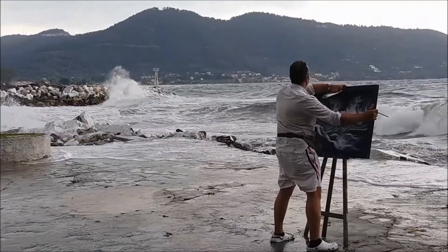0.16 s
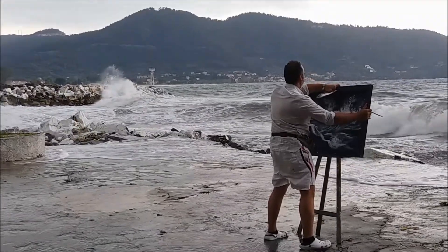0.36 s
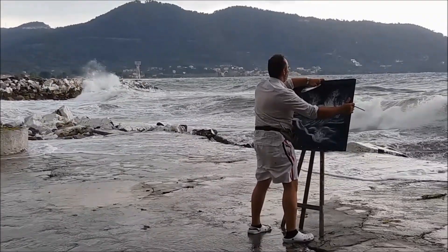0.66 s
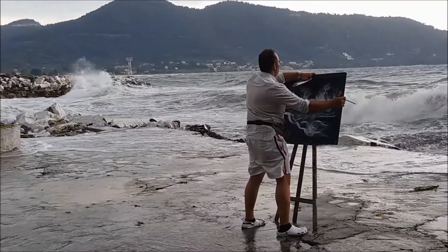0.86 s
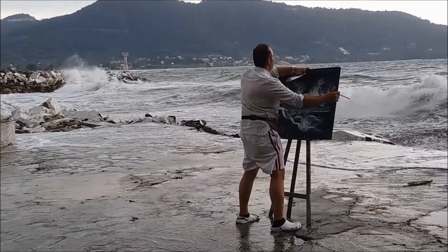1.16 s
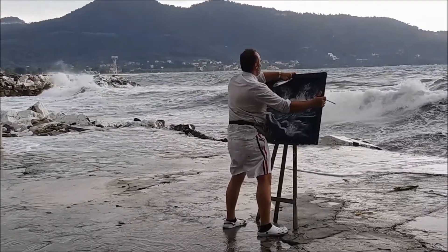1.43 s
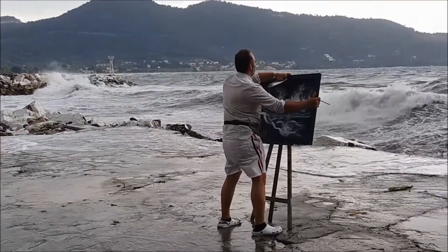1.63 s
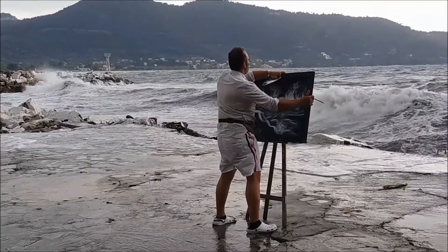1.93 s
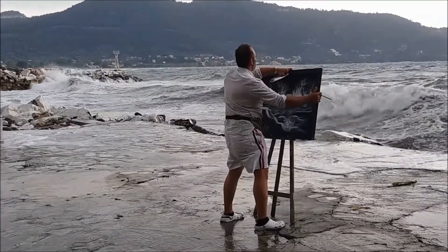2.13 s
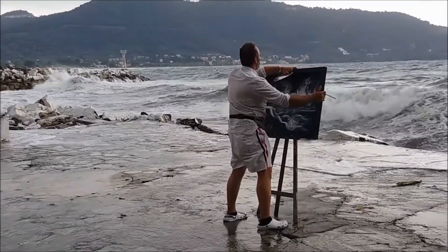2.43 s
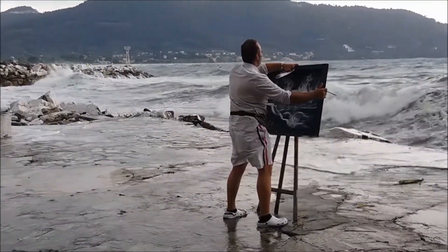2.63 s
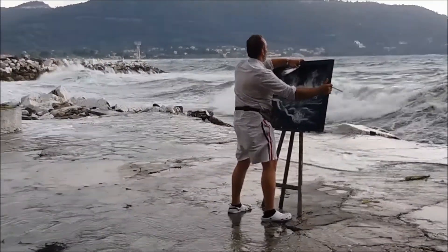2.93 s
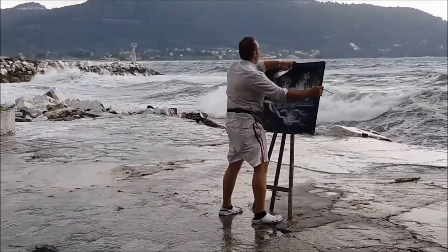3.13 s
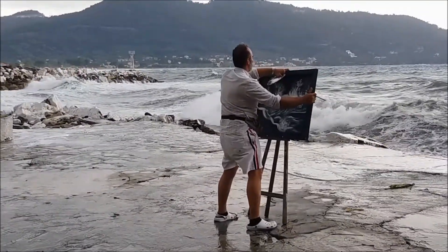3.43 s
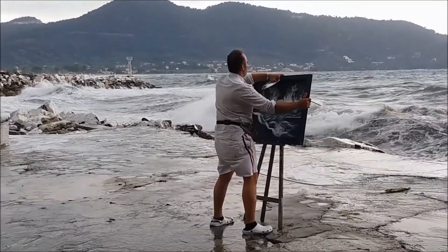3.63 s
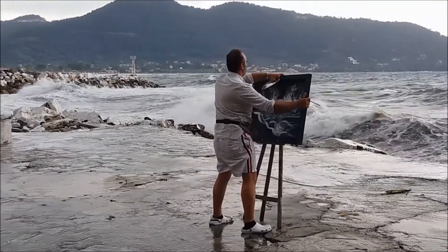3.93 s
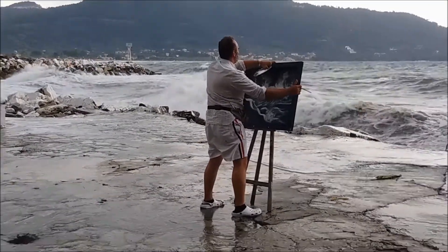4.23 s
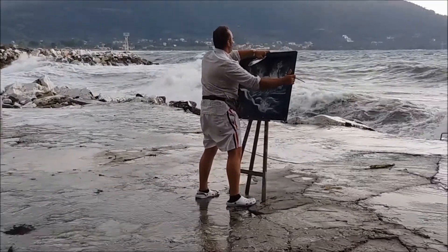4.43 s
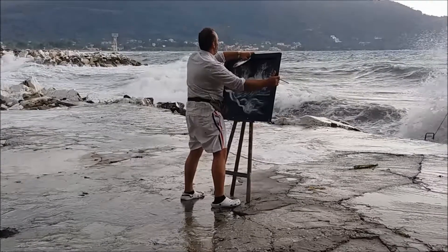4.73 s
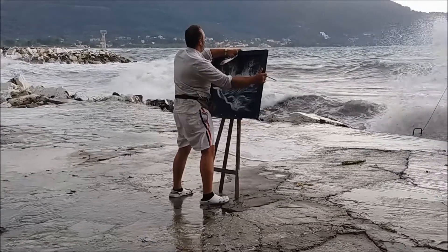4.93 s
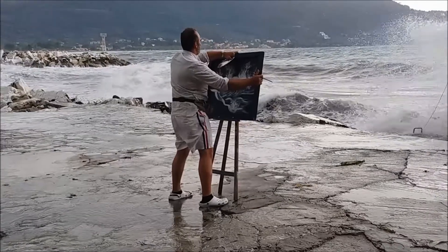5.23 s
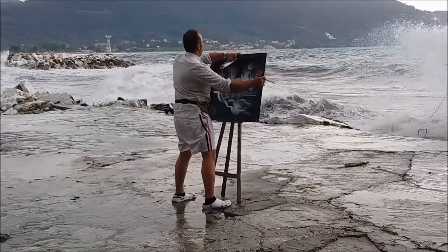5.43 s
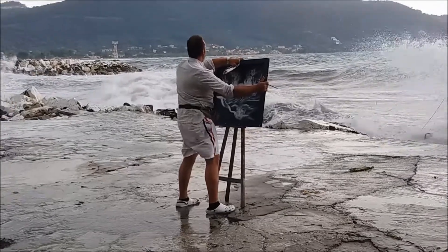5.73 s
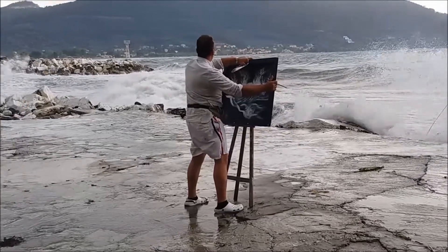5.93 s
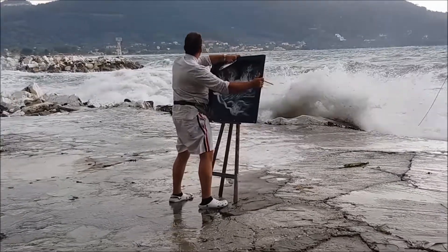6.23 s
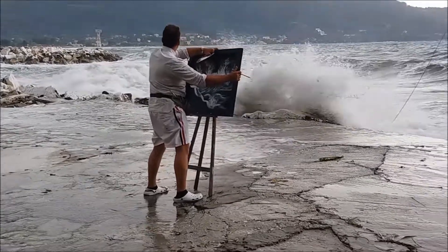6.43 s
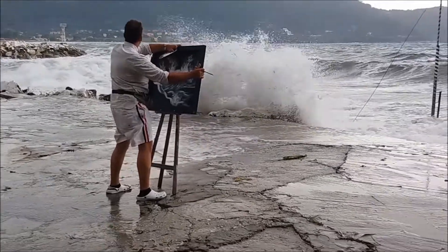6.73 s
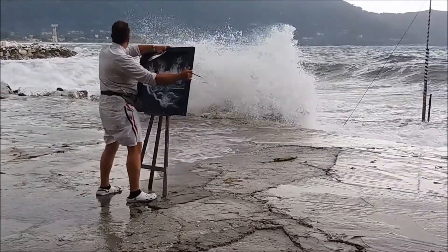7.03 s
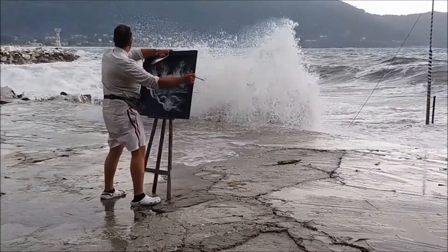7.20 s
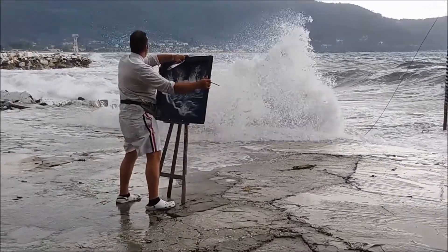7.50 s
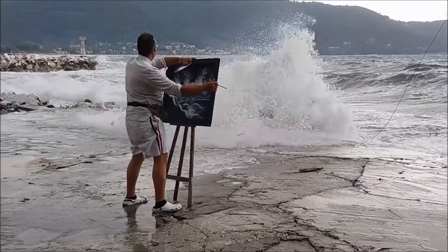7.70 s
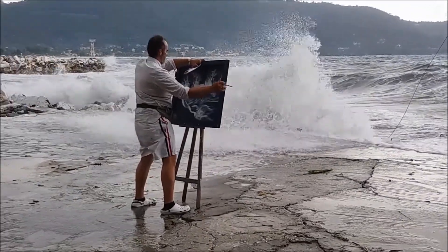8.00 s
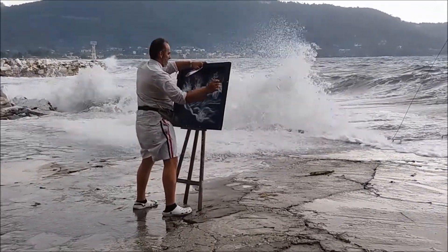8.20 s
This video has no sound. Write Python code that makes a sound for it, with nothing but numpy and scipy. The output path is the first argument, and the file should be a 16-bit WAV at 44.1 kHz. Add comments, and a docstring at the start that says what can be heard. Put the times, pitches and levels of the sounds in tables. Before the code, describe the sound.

A close hand-held mono microphone faces rough waves on a paved waterfront. The sea is a dense, steady wash with hollow low swells and a fizzy top, no clear separate crashes. Low wind thumps and rumbles crowd the opening, thinning after three seconds. Occasional drops tick and thud on the housing. Toward the end the microphone turns away and the surf sounds softer and more muffled.

```python
"""Gusty wind rumbles and buffets in a small hand-held microphone while rough surf roars on a breakwater.
The sea is noise that changes in level and in colour as the microphone turns, with swells around one pitch.
Wind is lumpy low noise, and the strongest eddies are short swings of the diaphragm that slow down.
A few drops of spray tap the housing as brief rings with a thump and a splash.
A limiter ducks everything around the highest peaks."""
import sys
import numpy as np
from scipy import signal
from scipy.io import wavfile
from scipy.ndimage import uniform_filter1d, minimum_filter1d

SR = 44100
rng = np.random.default_rng(int(sys.argv[2]) if len(sys.argv) > 2 else 0)


def master_out(mix):
    """Clip the mix to full scale and print it as 16-bit PCM to the path in sys.argv[1]."""
    frames = np.transpose(np.atleast_2d(mix))
    ceiling = np.clip(frames, -1, 1)
    pcm = np.round(ceiling * 32767).astype(np.int16)
    wavfile.write(sys.argv[1], SR, pcm)


N = 368676  # samples


def gain_of(db):
    """Amplitude factor of a level in dB."""
    return 10 ** (np.asarray(db) / 20)


def evened(x):
    """Scales a signal to rms 1."""
    return x / np.sqrt(np.mean(x ** 2) + 1e-20)


def bump(x, width):
    """Bell of height 1 around x = 0."""
    return np.exp(-(x / width) ** 2)


def ramp(hz, lo_hz, hi_hz):
    """Rises from 0 to 1 between two frequencies, evenly in pitch."""
    return np.clip(np.log((hz + 1) / lo_hz) / np.log(hi_hz / lo_hz), 0, 1)


def read(points, hz):
    """Reads a spectrum table at the frequencies hz, straight lines over log frequency."""
    point_hz, level_db = np.transpose(points)
    return np.interp(np.log(hz + 1), np.log(point_hz + 1), level_db)


def follow(rows, t):
    """Reads every column of a time table at the times t."""
    row_s, *columns = np.transpose(rows)
    return [np.interp(t, row_s, column) for column in columns]


def add(mix, start_s, sound):
    """Adds a sound to the mix from its start time, cut at the end of the mix."""
    part = mix[round(start_s * SR):][:len(sound)]
    part += sound[:len(part)]


def grid(size):
    """Frame times [s] and bin frequencies [Hz] of short-time spectra that overlap by three quarters."""
    t = np.arange(N * 4 // size + 5) * size / 4 / SR
    return t, np.fft.rfftfreq(size, 1 / SR)[:, None]


def noise(field_db, size):
    """Random short-time spectra under a dB field of bins x frames, each bin adding its rms level."""
    bins, frames = field_db.shape
    real, imaginary = rng.standard_normal((frames, bins, 2)).T
    # sqrt(3/2) makes up for the averaging of overlapping random frames
    spectra = (real + 1j * imaginary) * gain_of(field_db) * np.sqrt(3 / 2)
    return signal.istft(spectra, nperseg=size, noverlap=size * 3 // 4)[1][:N]


def blotches(bins, frames, high, long):
    """Smooth random patches of rms 1, averaged over `high` bins and `long` frames."""
    x = rng.standard_normal((frames, bins)).T
    return evened(uniform_filter1d(uniform_filter1d(x, high, 0), long, 1))


def band_db(colour_db, hz, lo_hz, hi_hz):
    """Power of a spectrum summed inside a band, in dB."""
    inside = (hz >= lo_hz) & (hz < hi_hz)
    return 10 * np.log10(np.sum(gain_of(2 * colour_db) * inside, 0))


def levelled(colour_db, hz, edges_hz, levels_db):
    """Bends a spectrum smoothly to bring its low, middle and high bands to the given levels."""
    low, mid, high = (db - band_db(colour_db, hz, *edges_hz[k:k + 2]) for k, db in enumerate(levels_db))
    below = 1 - ramp(hz, .8 * edges_hz[1], 1.25 * edges_hz[1])
    above = ramp(hz, .8 * edges_hz[2], 1.25 * edges_hz[2])
    return colour_db + mid + below * (low - mid) + above * (high - mid)


# Wind at the microphone: (time [s], strength [dB], tilt from flutter towards deep rumble [dB])
WIND_STRENGTH = [(0, -26.5, 0.5), (.3, -22., 0.5), (.65, -20.5, -4.5), (1.0, -23.5, -1), (1.4, -24.5, 1),
                 (2.2, -25, 0), (2.7, -24.5, 4.5), (3.3, -24., -2), (4.0, -26., -2.5), (4.8, -26.5, -4.),
                 (5.4, -29.5, 0), (6.0, -32.5, -1), (6.5, -30.5, 2), (7.2, -32, -0.5), (7.7, -30, -2),
                 (8.36, -32., 2)]
# Colour of the turbulence: (frequency [Hz], relative level per Hz [dB])
EDDY_COLOUR = [(10, -32), (22, -14), (40, -2), (80, 4), (130, -2), (205, -4.5), (260, -13.5), (330, -16.5),
               (450, -19.5), (800, -66.5)]
# How deep rumble, body and flutter follow the wind, a row each:
# (level at CALM_DB before tilt and swells [dB], slope [dB per dB], share of the tilt, middle frequency [Hz])
WIND_BANDS = [(-35.5, 1.6, 0.85, 40), (-30., 1.01, 0.24, 116), (-33.5, 0.83, -0.48, 154)]
# Brief swells of the low wind noise, each strongest around one pitch:
# (time of the peak [s], rise at the middle frequency [dB], middle frequency [Hz])
WIND_SWELLS = [(.2, 5, 50), (.3, 8, 220), (.6, 7, 40), (.66, 5, 190), (.92, 12, 40), (1.0, 4, 111),
               (1.2, 4, 40), (1.68, 14, 40), (1.8, 4.5, 80), (2.02, 0, 45), (2.22, 9, 40), (2.5, 5.5, 111),
               (2.86, 1, 40), (3.0, 7.5, 45), (3.0, 5.5, 200), (3.4, 2.5, 120), (4.0, 2, 80),
               (5.8, 4.5, 150), (6.1, 4., 45), (6.6, 3, 110), (7.4, 3., 40), (8.0, 7., 40)]
CALM_DB = -30
WIND_SWELL_S, WIND_SWELL_OCTAVES = 0.071, 0.8  # half-widths in time and pitch


def wind(size=1024):
    """Turbulence over the port: low noise in lumps across the whole band, with brief swells around a pitch."""
    t, hz = grid(size)
    peak_s, rise_db, swell_hz = np.transpose(WIND_SWELLS)[:, :, None]
    strength_db, tilt_db = follow(WIND_STRENGTH, t)
    levels_db = []
    for calm_db, slope, tilt_share, band_hz in WIND_BANDS:
        nearness = bump(np.log2(swell_hz / band_hz), WIND_SWELL_OCTAVES)
        swells_db = np.sum(rise_db * bump(t - peak_s, WIND_SWELL_S) * nearness, 0)
        levels_db.append(calm_db + slope * (strength_db - CALM_DB) + tilt_share * tilt_db + swells_db)
    field_db = levelled(read(EDDY_COLOUR, hz), hz, (20, 60, 160, 300), levels_db)
    low = noise(field_db, size)
    lumps = evened(uniform_filter1d(uniform_filter1d(rng.standard_normal(N), size=900), size=900))
    return low * gain_of(1.64 * lumps)  # lumps of 1.64 dB rms


# Single strong eddies at the port:
# (start time [s], relative level [dB], mean swing frequency [Hz], length [cycles])
BUFFETS = [(0.537, -3.5, 149.8, 4.8), (0.558, -7, 64.3, 1.6), (0.646, -10, 141.5, 4.6),
           (.664, -1.5, 74, 3.1), (0.757, -7.5, 97, 2.6), (0.96, -10, 80.5, 1.9), (1.605, -16, 58.3, 2.6),
           (1.641, -11, 81.8, 4.2), (1.693, -10, 75, 1.24), (1.718, -10, 72, 1.9), (1.779, -9, 79, 2.9),
           (1.988, -8.5, 55.6, 2.3), (2.168, -15.5, 48.5, 2.5), (2.778, -12.5, 42, 2.8),
           (3.962, -21, 106, 1.9), (7.708, -21.5, 175, 3.6), (8.127, -21, 173, 3)]


def buffets():
    """Each eddy pushes the diaphragm through a few swings that slow down."""
    out = np.zeros(N)
    ragged = signal.butter(2, [170, 480], "band", fs=SR, output="sos")
    for start_s, db, hz, cycles in BUFFETS:
        u = np.arange(0, 1, hz / cycles / SR)  # progress through the eddy, 0 to 1
        swing = np.sin(2 * np.pi * cycles * (u + .3 * u * (1 - u)))
        swing -= 0.64 * swing ** 2  # suction peaks are sharper than pushes
        # smaller eddies ride along, more on quick swings
        small_eddies = evened(signal.sosfilt(ragged, rng.standard_normal(8000)))[-len(u):]
        swing += 0.23 * (hz / 120) * small_eddies
        envelope = np.sin(np.pi * u ** 0.66) ** 1.64
        add(out, start_s, gain_of(db) * swing * envelope)
    return out


# Spray on the housing; levels are relative, before the soft onset:
# (time [s], ring level [dB], ring frequency [Hz], ring t60 [s], thump level [dB], splash level [dB])
TAPS = [(1.345, -9, 536, 0.025, -6, -28), (1.603, -23, 880, 0.011, -4, -24),
        (2.0765, -18, 4840, 0.0065, -60, -40), (5.0322, 3.5, 776, 0.0059, -2.5, -24),
        (5.502, 1, 564, 0.021, 2, -18), (6.192, -21, 1320, 0.028, -12, -30),
        (6.532, -25, 1170, 0.055, -5.5, -23), (6.619, -21, 1370, 0.018, -35, -28),
        (7.343, -18, 895, 0.014, -24, -32), (7.816, -21, 600, 0.014, -25, -27.5),
        (8.154, -12, 1560, 0.0095, -8, -25)]
THUMP_HZ, THUMP_T60_S, SPLASH_T60_S = 178, 0.027, 0.096


def taps():
    """A soft blow: a brief ring of the housing over a dull thump, and the drop's splash."""
    out = np.zeros(N)
    t = np.arange(0, .09, 1 / SR)
    onset = 1 - np.exp(-(t / .0005) ** 2)
    wet = signal.butter(4, [400, 1900], "band", fs=SR, output="sos")
    hisses = rng.standard_normal((len(TAPS), len(t)))
    for (start_s, ring_db, hz, t60_s, thump_db, splash_db), hiss in zip(TAPS, hisses):
        fade_db = -60 * t / t60_s
        ring = np.sin(2 * np.pi * hz * t)
        ring += .45 * gain_of(fade_db / 2) * np.sin(2 * np.pi * 1300 * t)  # fades faster than the main ring
        thump = gain_of(thump_db - 60 * t / THUMP_T60_S) * np.sin(2 * np.pi * THUMP_HZ * t)
        thump *= 1 - np.exp(-t / 0.0023)
        splash = gain_of(splash_db - 60 * t / SPLASH_T60_S) * evened(signal.sosfilt(wet, hiss))
        add(out, start_s, onset * (gain_of(ring_db + fade_db) * ring - thump + splash))
    return out


# The sea: (time [s], level of the body, 1150 to 3150 Hz [dB])
SURF_BODY = [(0, -29.5), (.4, -26), (.62, -28.5), (1.05, -29.), (1.75, -32.5), (2.2, -29.), (2.62, -25),
             (2.82, -26.5), (3.02, -29), (3.6, -31.), (4.0, -32.5), (4.6, -33.), (5.1, -31), (5.4, -31.5),
             (5.62, -31.), (5.88, -32.5), (6.02, -35.5), (7.2, -36), (8.36, -35)]
# Roar with the microphone facing the waves: (frequency [Hz], relative level per Hz [dB])
FACING_COLOUR = [(200, -14), (300, 2.5), (450, 8), (600, 7), (790, 1), (970, 9.5), (1080, 1.5), (1280, 4.5),
                 (1430, 1), (1650, 3), (1850, 1), (2100, -1), (2600, -1.5)]
# Roar with the microphone turned away: (frequency [Hz], relative level per Hz [dB])
TURNED_COLOUR = [(200, -15), (300, 7.5), (450, 6.5), (700, 9.5), (820, 7), (940, 7), (1250, 6), (1500, -2),
                 (1850, -4.5), (2100, 4), (2350, -2.5), (2600, -0.5)]
# Resonances of the microphone port and housing: (frequency [Hz], relative level [dB])
PORT = [(2200, -0.5), (2700, -6), (3150, -12.5), (3450, -10.5), (3950, -4.5), (4300, -9), (5000, -16),
        (5750, -23.5), (6300, -20.5), (6900, -19.5), (7800, -23.5), (8700, -24), (9800, -26)]
# Aim of the microphone:
# (time [s], turn from 0 facing to 1 away, treble above 5 kHz before the bands are levelled [dB])
TURN = [(0, .42, -1.5), (.9, 0.25, -1.5), (1.6, .35, -2.5), (2.1, .01, -1.), (2.7, .05, -0.5),
        (3.7, 0.15, -1), (4.5, .35, 0), (5.8, 0.36, -1.3), (6.1, 0.58, -3), (7.3, .72, -3),
        (8.36, 0.68, -4.)]
# Swells of surf noise around one pitch, low hollow booms and one higher surge near 1 kHz:
# (time of the peak [s], rise before levelling [dB], frequency [Hz])
SURF_SWELLS = [(.15, 11.5, 390), (1.6, 5.5, 482), (2.45, 2, 960), (2.9, 7, 460), (3.8, 2.5, 420),
               (4.45, 3.5, 497), (6.2, 3, 507), (7.0, 4, 510), (8.3, 5.5, 550)]
SURF_SWELL_S = 0.45  # half-width in time
USUAL_DB = -31  # body level at which roar and fizz take their own base levels
ROAR_DB, ROAR_SLOPE, ROAR_PER_SWELL = -30.5, 1.05, .3  # the low roar follows the body and the swells
FIZZ_DB, FIZZ_SLOPE, FIZZ_TURNED_DB = -40, 1.15, -3.4  # louder surf is brighter, and duller from behind
TOP_DULL_AT_S, TOP_DULL_S, TOP_DULL_DB = 4.4, .8, -3  # the top dulls for a while, before levelling


def surf(size=512):
    """Countless bubbles merge to noise; its level varies slightly in random patches of time and pitch."""
    t, hz = grid(size)
    turned, treble_db = follow(TURN, t)
    body_db, = follow(SURF_BODY, t)
    colour_db = (1 - turned) * read(FACING_COLOUR, hz) + turned * read(TURNED_COLOUR, hz) + read(PORT, hz)
    colour_db -= 60 * (1 - ramp(hz, 100, 200))  # leaves the deep bass to the wind
    colour_db += treble_db * ramp(hz, 4800, 4900)
    colour_db += TOP_DULL_DB * bump(t - TOP_DULL_AT_S, TOP_DULL_S) * ramp(hz, 7800, 8400)
    roar_db = ROAR_DB + ROAR_SLOPE * (body_db - USUAL_DB)
    for peak_s, rise_db, swell_hz in SURF_SWELLS:
        swell_db = rise_db * bump(t - peak_s, SURF_SWELL_S)
        colour_db += swell_db * bump(np.log((hz + 1) / swell_hz), .2)
        roar_db += ROAR_PER_SWELL * swell_db
    fizz_db = FIZZ_DB + FIZZ_SLOPE * (body_db - USUAL_DB) + FIZZ_TURNED_DB * turned
    field_db = levelled(colour_db, hz, (330, 1150, 3150, 10000), (roar_db, body_db, fizz_db))
    narrow_long_db = 0.54 * blotches(len(hz), len(t), high=5, long=16)
    broad_short_db = 0.21 * blotches(len(hz), len(t), high=60, long=8)
    return noise(field_db + narrow_long_db + broad_short_db, size)


def scene():
    """Sea, wind, buffets and spray together, as one channel."""
    return (surf() + wind() + buffets() + taps())[None]


def record(dry):
    """High-pass; a look-ahead limiter lowers the gain around high peaks; then the band limit."""
    # removes the constant offset and deepest bass of the swings
    dry = signal.sosfilt(signal.butter(2, 30, "high", fs=SR, output="sos"), dry)
    peak = -minimum_filter1d(-abs(dry[0]), size=3000)  # highest peak nearby, before or after
    peak_db = 20 * np.log10(peak + 1e-9)
    fall_db = np.arange(N) * 200 / SR  # held peaks recover at 200 dB a second
    held_db = np.maximum.accumulate(peak_db + fall_db) - fall_db
    over_db = np.maximum(held_db + 3.5, 0)  # excess above -3.5 dB
    ducked = dry / gain_of(.6 * uniform_filter1d(over_db, size=1600))
    band_limit = signal.firwin(1023, 10200, window=("kaiser", 9), fs=SR)
    return signal.oaconvolve(ducked, band_limit[None], "same")


dry = scene()
out = record(dry)
master_out(out)
```